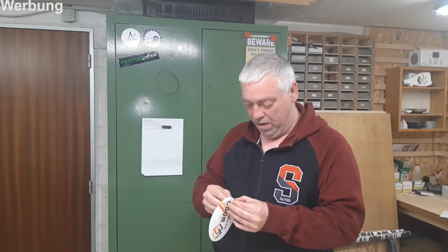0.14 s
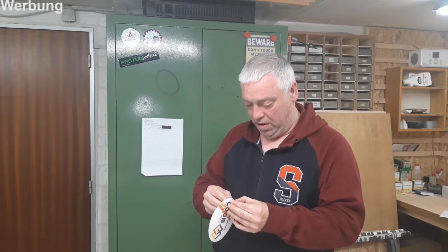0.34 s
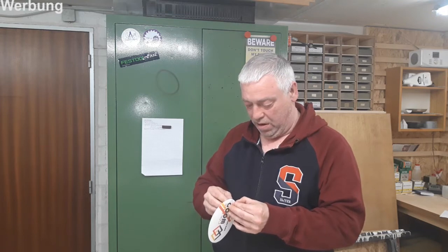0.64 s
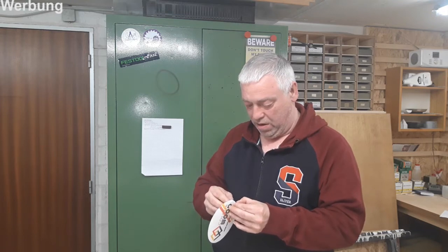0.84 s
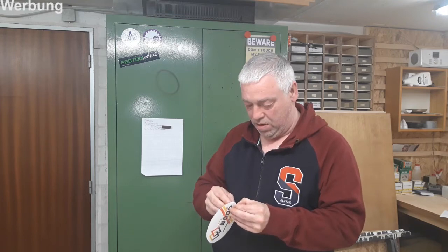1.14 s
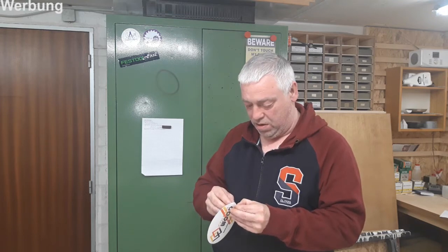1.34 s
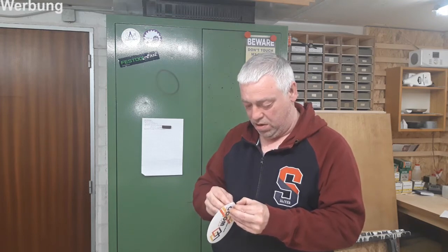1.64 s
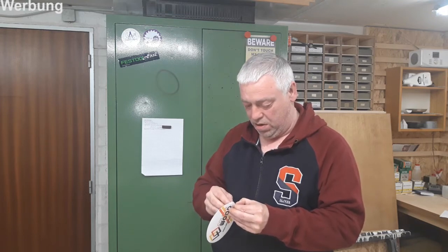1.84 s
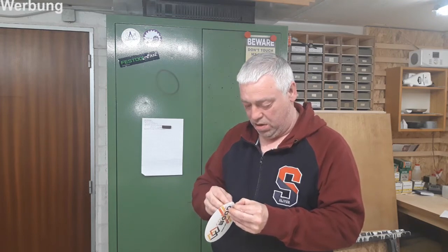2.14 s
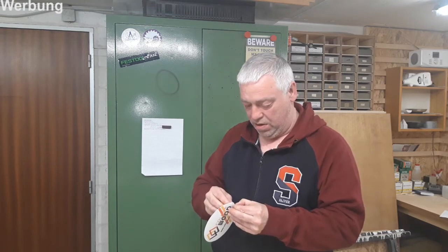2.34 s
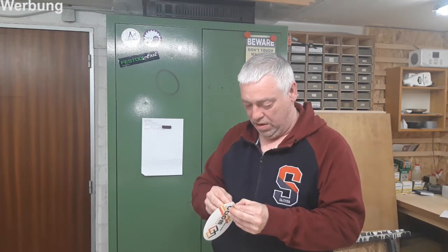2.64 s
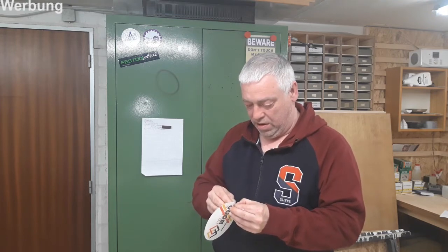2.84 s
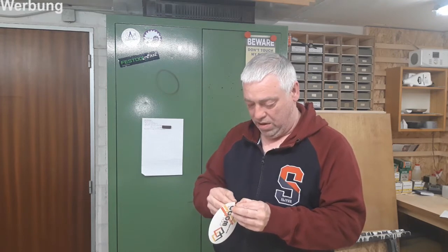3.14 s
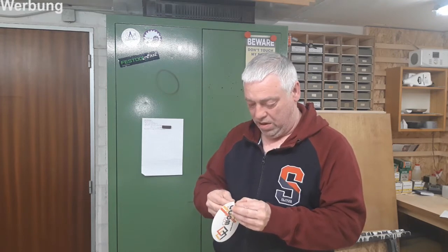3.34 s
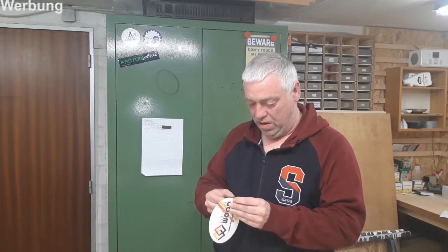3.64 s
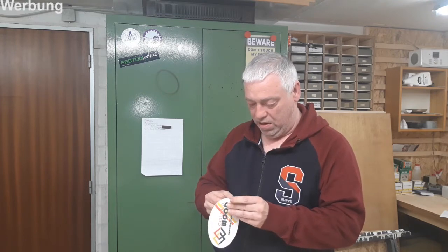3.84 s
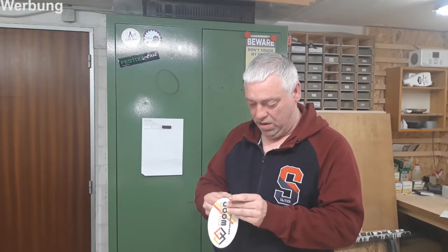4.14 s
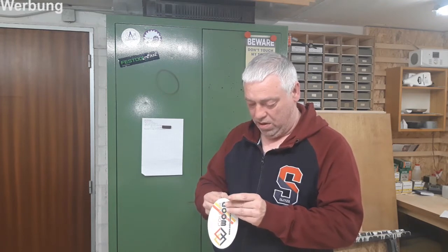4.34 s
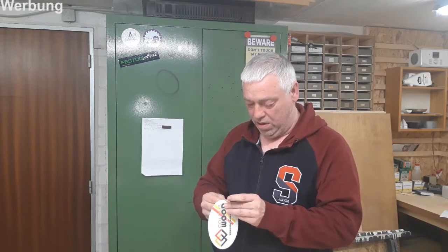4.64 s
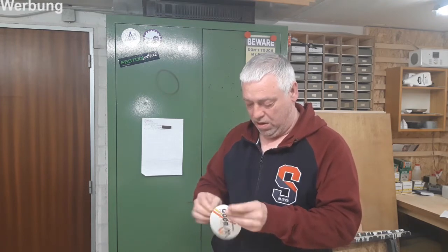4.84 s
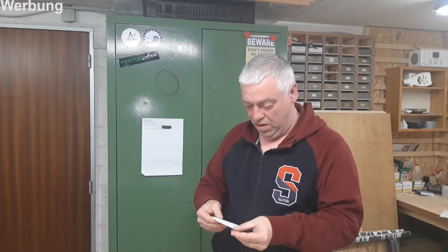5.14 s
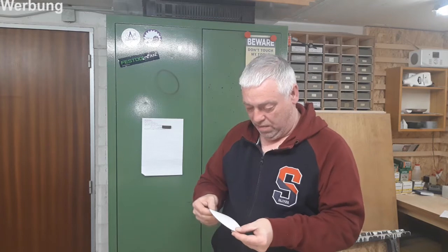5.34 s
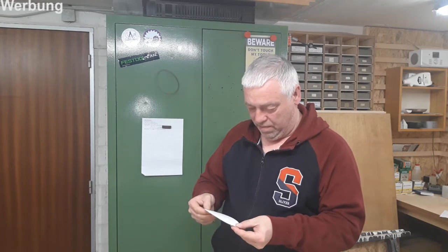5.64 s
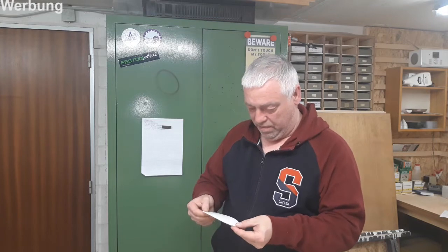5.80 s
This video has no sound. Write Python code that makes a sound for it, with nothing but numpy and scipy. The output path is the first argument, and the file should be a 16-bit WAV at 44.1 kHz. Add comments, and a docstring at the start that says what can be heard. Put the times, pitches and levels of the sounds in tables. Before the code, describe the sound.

Close to the microphone, fingernails pick at a stiff sticker's edge in a quiet workshop. A shoe scuffs the floor early, then a small click follows. A fainter scuff precedes a sharper double snap with a dull low thump. A tiny squeaky slip, faint rustles and a tight cluster of crackly clicks follow, with short reflections from hard walls over soft hiss and low rumble.

```python
"""Fingernails, close to the microphone, pick at a stiff sticker's edge in a quiet, hard-walled workshop.
Cracks ring the sheet, slip clicks squeak past a nail, and clumps of paper grains rustle.
A shoe scuffs dully: rough grains ring the floor. Close sounds get early echoes and a tail dying by band.
Under them lie shaped noises: a low rumble with bumps, microphone hiss, and dull low-mid swells,
mostly soft, with one sudden dull burst along with a snap."""
import sys
import numpy as np
from scipy import signal
from scipy.fft import rfft, irfft
from scipy.io import wavfile

SR = 44100
rng = np.random.default_rng(int(sys.argv[2]) if len(sys.argv) > 2 else 0)


def undo_db(level):
    """Turn decibels back into plain size, where 20 dB means ten times bigger."""
    steps = np.asarray(level, float) / 20
    return 10 ** steps


def store_wav(level_fs):
    """Save 16-bit WAV to argv[1]."""
    pcm = np.round(np.clip(np.atleast_2d(level_fs), -1, 1) * 32767)
    wavfile.write(sys.argv[1], SR, pcm.T.astype(np.int16))


N = 263265   # samples, just under 6 s

# noise spectra of the background: pitch_hz, density_db (relative, per Hz)
DEEP_RUMBLE = [(40, -31), (65, -19), (85, -1), (100, -5), (130, -25), (300, -79)]
UPPER_RUMBLE = [(70, -79), (105, 3), (125, 1.5), (165, -1), (200, -7), (260, -14), (500, -54)]
DULL_SPECTRUM = [(200, -43), (290, 0), (370, 4), (470, -1.5), (650, -4), (1000, -10), (1800, -24.5)]
HISS_SPECTRUM = [(15, -21), (40, 9), (250, 2), (700, -1), (1500, -4), (3000, -5), (7000, -7), (11000, -10),
                 (14000, -7.5), (15700, -5.5), (16000, -30), (17000, -60)]
# hiss that differs between channels: pitch_hz, side_db (against the shared part)
HISS_SIDE = [(60, -9), (110, -3), (200, -9), (380, -8), (700, -8), (1290, -7), (2380, -6.5), (4400, -3.5),
             (8120, -2), (15000, -1)]
# low bumps in the rumble: peak_s, deep_db, upper_db, rise_s, fall_s (time for 20 dB)
BUMPS = [(0.24, -68, -54.5, .2, .15), (0.37, -69, -78, 0.16, .2), (0.8, -73, -59.5, 0.21, 0.43),
         (1.31, -52.5, -49, 0.031, 0.14), (1.418, -61.5, -70, 0.27, 0.46), (2.14, -58, -67.5, 0.69, 0.28),
         (2.56, -62, -56.5, 0.18, 0.32), (2.95, -74, -55, 0.038, 0.3), (3.3, -62.5, -73, .4, 0.37),
         (3.78, -63.5, -72, 0.28, .4), (4.36, -67, -68.5, 0.19, 0.27), (5.26, -56, -74, 0.18, 0.15),
         (5.8, -81, -65.5, 0.27, 0.27)]
# dull low-mid swells, one of them a sudden burst: peak_s, level_db, rise_s, fall_s (time for 20 dB)
DULL_SWELLS = [(0.01, -67.5, 0.11, 1), (0.66, -65, 0.48, 0.66), (2.1, -69, 0.46, 0.57),
               (2.949, -38, 0.029, 0.12), (3.25, -61.5, 0.35, 0.3), (3.64, -62.5, 0.42, 0.22),
               (4.9, -60.5, 0.35, .3), (5.3, -68.5, 0.8, 0.59), (5.75, -69, 0.72, 0.48)]
# steady levels under the bumps and the dull swells, and of the hiss
DEEP_DB, UPPER_DB, DULL_DB, HISS_DB = -71.5, -70.5, -76, -62.5

# shoe scuffs: full_pressure_s, hold_s, level_db (dull part), bright_db (above level_db)
SCUFFS = [(0.854, 0.071, -50, 1.5), (2.548, 0.028, -56, -28)]
# swells of the floor's hollow ring: peak_s, level_db
HOLLOW_KNOCKS = [(0.863, -47), (2.6, -52.5)]
# floor resonances in three lists, dull, bright and hollow: pitch_hz, width_hz, level_db (relative)
FLOOR = [(336, 35, 0), (411, 64, 0), (580, 254, 5)], [(946, 140, 7), (1130, 316, 0.5)], [(787, 97, 0)]
# scuff and knock swells: time for 20 dB
SCUFF_RISE_S, SCUFF_FALL_S = 0.071, 0.12
BRIGHT_LAG_S, BRIGHT_FALL_S = 0.042, 0.12   # the bright part peaks later, without a hold
KNOCK_RISE_S, KNOCK_FALL_S = 0.02, 0.058
SCUFF_ROOM_DB = -8   # how much of the scuffs is sent to the room

# moments of the nail snaps: start_s
SNAP_TIMES = [1.3081, 2.9208, 2.9219, 3.951, 4.715, 4.7195, 4.7219, 4.7241, 4.866]
# strength of the same snaps: level_db, then body_db, ring_db, edge_db above it, weighted by SHEET_ANSWER
SNAPS = [(-27.5, -48, -13, -33), (-20, -20, -8.5, 14.5), (-13, -36, -14.5, -26), (-26.5, -21, -17.5, -6.5),
         (-34, -29, -7, 7), (-23, -24.5, -15, 21.5), (-21, -18, -25, 20.5), (-26.5, -15.5, -10.5, 9),
         (-43, -14.5, -12, 15)]
# resonances of the stiff sheet: pitch_hz, width_hz
SHEET = [(430, 314), (750, 400), (1300, 207), (1800, 365), (3700, 3860), (6500, 3400), (11500, 8400)]
# answer of each sheet resonance: level_db, then body_share, ring_share, edge_share (plain factors)
SHEET_ANSWER = [(-0.5, 0.99, 0.3, 0.17), (-1.5, 0.84, 0, 0), (0.5, 0.98, 0.077, 0.23),
                (0.5, 0.041, 0.95, 0.039), (0.5, 0.0055, 0, 0.19), (4, 0.028, 0, 0.0032),
                (4.5, 0.066, 0.048, 0.9)]
# faint rustles: centre_s, length_s, level_db (relative), pitch_hz
RUSTLES = [(1.666, 0.0099, -67, 4440), (3.188, 0.044, -74.5, 1900), (3.3, 0.1, -81, 1890),
           (3.87, 0.058, -73.5, 6800), (4.105, 0.038, -71.5, 8040), (4.214, 0.023, -67, 6340),
           (4.684, 0.017, -62, 4850), (4.697, 0.0097, -55.5, 9100), (4.95, 0.067, -71, 8500),
           (5.06, 0.31, -79, 1490), (5.15, 0.041, -74.5, 6950)]
# nail dragging on the waxed backing: pitch_hz, width_hz, level_db (relative)
SQUEAK = [(1900, 200, -12.5), (2640, 210, -21), (4200, 830, -24), (5140, 550, -2), (5660, 940, -1),
          (7320, 270, 5.5), (8500, 430, 6.5), (9800, 890, 0), (12400, 1500, -28)]
# drag pressure: time_s, level_db
DRAG = [(3.398, -75), (3.404, -65), (3.409, -41), (3.418, -55.5), (3.434, -63), (3.445, -76)]

# early echoes off the walls: delay_ms, level_db (against the direct sound)
ECHOES = [(3.3, -7.0), (7.0, -8), (10.3, -9)]
# decay of the tail, before its late fade: pitch_hz, t60_s
TAIL_T60 = [(300, 0.43), (1000, 0.19), (3000, 0.33), (7000, 0.3), (11000, 0.21), (16000, 0.14)]
TAIL_DB = 6            # energy of the tail against the direct sound
TAIL_BUILD_S = 0.004   # time constant of the onset
TAIL_KNEE_S = 0.27     # past this the tail sinks away faster
TAIL_LUMPS_DB, TAIL_LUMP_S = 1.5, 0.0015   # reflections arrive in clumps
WIDTH_DB = -52         # part of the tail that differs between channels
# sign of the side signal in the left and right channels: sign (no unit)
LEFT_RIGHT = np.array([[1], [-1]])


def rms_one(x):
    """Scale to rms 1."""
    return x / np.sqrt(np.mean(x ** 2) + 1e-20)


def at_hz(points, hz):
    """Read a table on a log-frequency axis."""
    table_hz, values = np.array(points).T
    return np.interp(np.log(hz), np.log(table_hz), values)


def swell(peak_s, level_db, rise_s, fall_s, hold_s=0):
    """Gain that climbs 20 dB in rise_s, holds, and drops 20 dB in fall_s."""
    t = np.arange(N) / SR - peak_s
    below_before = 20 * np.maximum(-t / max(rise_s, 0.002), 0)
    below_after = 20 * np.maximum((t - hold_s) / max(fall_s, 0.002), 0)
    return undo_db(level_db - below_before - below_after)


def in_power(steady_db, gains):
    """Unrelated sounds add in power."""
    return np.sqrt(undo_db(steady_db) ** 2 + sum(g ** 2 for g in gains))


def coloured(spectrum, side_db):
    """Steady noise of a given spectrum with a part that differs between channels; rms 1."""
    hz = np.maximum(np.fft.rfftfreq(N, 1 / SR), 1)
    mid, side = rfft(rng.standard_normal((2, N))) * undo_db(at_hz(spectrum, hz))
    side = side * undo_db(at_hz(side_db, hz))
    return rms_one(irfft(mid + side * LEFT_RIGHT, N))


def resonance(x, hz, width):
    """Two-pole resonance with gain 1 on top; a narrower width in Hz rings longer."""
    r = np.exp(-np.pi * width / SR)
    zeros = [(1 - r * r) / 2, 0, (r * r - 1) / 2]
    poles = [1, -2 * r * np.cos(2 * np.pi * hz / SR), r * r]
    return signal.lfilter(zeros, poles, x)


def grains(per_s, spread_db):
    """Random clicks of uneven size; rms 1."""
    sizes = undo_db(spread_db * np.minimum(rng.exponential(1, N), 5)) * rng.choice([-1, 1], N)
    return rms_one(sizes * (rng.random(N) < per_s / SR))


def rumble():
    """Two bands of low noise, each rising over its steady level in bumps."""
    deep = in_power(DEEP_DB, [swell(s, db, rise, fall) for s, db, _, rise, fall in BUMPS])
    upper = in_power(UPPER_DB, [swell(s, db, rise, fall) for s, _, db, rise, fall in BUMPS])
    return deep * coloured(DEEP_RUMBLE, [(100, -24)]) + upper * coloured(UPPER_RUMBLE, [(100, -29)])


def dull_swells():
    """Low-mid noise over a faint steady level: mostly soft swells, one sudden dull burst along with a snap."""
    gain = in_power(DULL_DB, [swell(*row) for row in DULL_SWELLS])
    return gain * coloured(DULL_SPECTRUM, [(100, -37)])


def microphone_hiss():
    """Steady coloured noise, partly different in the two channels."""
    return undo_db(HISS_DB) * coloured(HISS_SPECTRUM, HISS_SIDE)


def scuffs():
    """Rough friction grains ring the floor: dull under the stroke, bright at its height, hollow knocks."""
    dull = sum(swell(s, db, SCUFF_RISE_S, SCUFF_FALL_S, hold) for s, hold, db, _ in SCUFFS)
    bright = sum(swell(s + BRIGHT_LAG_S, db + over, SCUFF_RISE_S, BRIGHT_FALL_S)
                 for s, _, db, over in SCUFFS)
    hollow = sum(swell(s, db, KNOCK_RISE_S, KNOCK_FALL_S) for s, db in HOLLOW_KNOCKS)
    out = np.zeros(N)
    for modes, pressure in zip(FLOOR, (dull, bright, hollow)):
        rough = grains(900, 3.8)
        tone = np.zeros(N)
        for n, (hz, width, db) in enumerate(modes):
            ring = resonance(resonance(rough, hz, width), hz, 2 * width)
            tone += ring * undo_db(db) / np.sqrt(width) * (-1) ** n   # neighbours in opposite sign
        out += rms_one(tone) * pressure
    return out


def snaps():
    """Each sharp crack rings the sheet's resonances; successive cracks alternate between two spots."""
    rows = np.array(SNAPS)
    at = (np.array(SNAP_TIMES) * SR).astype(int)
    spot = np.arange(len(at)) % 2
    out = np.zeros((2, N))
    for (hz, width), (answer_db, *shares) in zip(SHEET, SHEET_ANSWER):
        strength_db = answer_db + rows[:, 0] + rows[:, 1:] @ shares
        clicks = np.full((2, N), 1e-18)
        clicks[spot, at] = undo_db(strength_db) * SR / (np.pi * width)   # makes up for the width
        out += resonance(resonance(clicks, hz, width), hz, 2 * width)
    return out


def rustles():
    """Small clumps of paper grains, each with a broad colour."""
    t = np.arange(N) / SR
    out = np.zeros(N)
    crackle = grains(1500, 3)
    for s, length, db, hz in RUSTLES:
        clump = crackle * np.exp(-0.5 * ((t - s) / (length / 2)) ** 2) + 1e-18
        width = 0.7 * hz
        colour = resonance(resonance(clump, hz, width), hz, width)
        out += undo_db(db) * colour * np.sqrt(SR / hz)
    return out


def drag():
    """A nail sticks and slips: dense clicks into resonances, under the drag pressure."""
    slips = grains(3000, 3.5)
    tone = sum(resonance(slips, hz, width) * undo_db(db) / np.sqrt(width) for hz, width, db in SQUEAK)
    time_s, level_db = np.array(DRAG).T
    pressure_db = np.interp(np.arange(N) / SR, time_s, level_db, -200, -200)
    return rms_one(tone) * undo_db(pressure_db)


def workshop(x):
    """Direct sound, early echoes and a diffuse tail whose bands die at their own pace."""
    t = np.arange(int(0.4 * SR)) / SR
    tail = np.zeros((2, len(t)))
    edges = 100 * 2 ** np.arange(0, 7.6, 0.5)   # half-octave bands, Hz
    white = rng.standard_normal((2, 2, len(t)))
    for k, (low, high) in enumerate(zip(edges, edges[1:])):
        band_filter = signal.butter(2, [low, high], "band", fs=SR, output="sos")
        band = signal.sosfilt(band_filter, white[k % 2])   # neighbouring bands use unrelated noise
        tail += band * undo_db(-60 * t / at_hz(TAIL_T60, np.sqrt(low * high)))
    tail *= 1 - np.exp(-t / TAIL_BUILD_S)   # reflections build up
    knots = np.arange(0, 0.41, TAIL_LUMP_S)
    lumps_db = TAIL_LUMPS_DB * np.interp(t, knots, rng.standard_normal(len(knots)))
    tail *= undo_db(lumps_db) * np.exp(-(t / TAIL_KNEE_S) ** 4)
    mid, side = tail * undo_db(TAIL_DB) / np.sqrt(np.sum(tail[0] ** 2))
    mid[0] += 1   # direct sound
    for ms, db in ECHOES:
        mid[int(ms * SR / 1000)] += undo_db(db)
    response = mid + undo_db(WIDTH_DB) * side * LEFT_RIGHT
    return signal.fftconvolve(x[None], response)[:, :N]


def scene():
    """Close sounds through the room, over the background; the scuffs are also heard direct."""
    background = rumble() + dull_swells() + microphone_hiss()
    rubbing = scuffs()
    one_spot, other_spot = snaps()
    close = one_spot + rustles() + drag() + undo_db(SCUFF_ROOM_DB) * rubbing
    room = workshop(close) + workshop(other_spot)   # another spot excites another tail
    return room + rubbing + background


def top_cut(x):
    """Nothing passes above the cut-off."""
    return signal.sosfilt(signal.butter(12, 16790, fs=SR, output="sos"), x)


def record(dry):
    """A steep low-pass takes off the top: 70 dB down from 16.8 kHz."""
    low_pass = signal.cheby2(12, 70, 16800, fs=SR, output="sos")
    mix = signal.sosfilt(low_pass, dry)
    return top_cut(mix)


dry = scene()
out = record(dry)
store_wav(out)
```